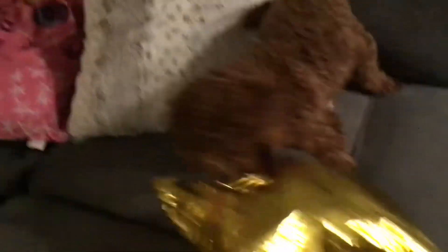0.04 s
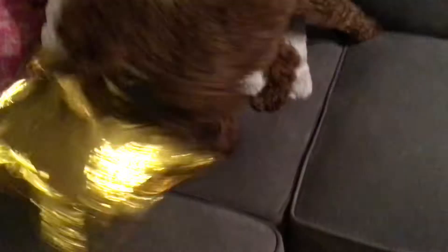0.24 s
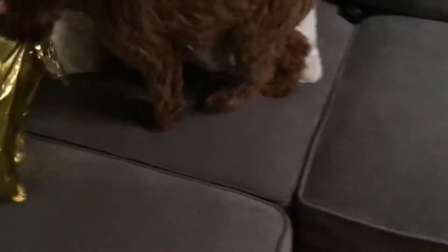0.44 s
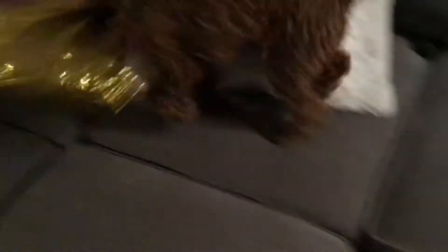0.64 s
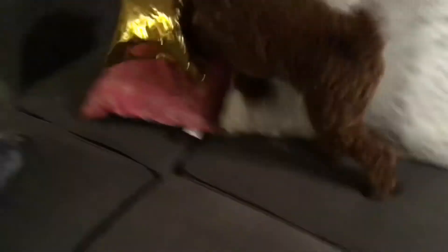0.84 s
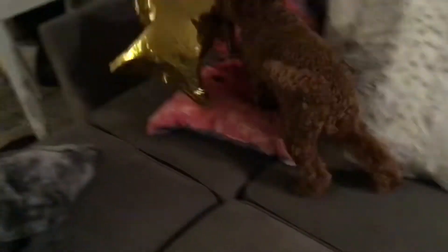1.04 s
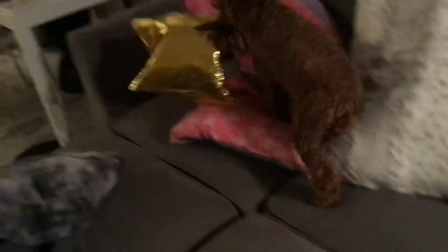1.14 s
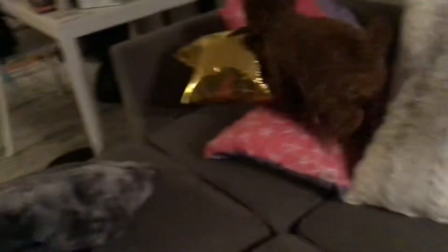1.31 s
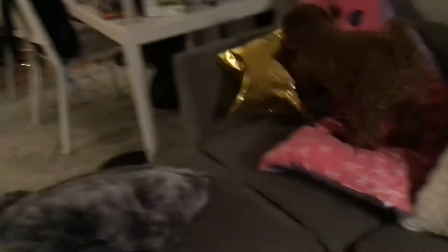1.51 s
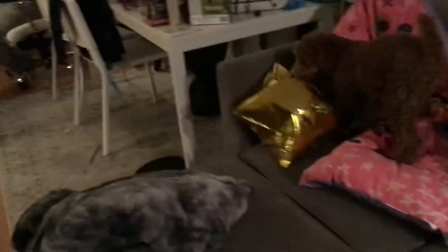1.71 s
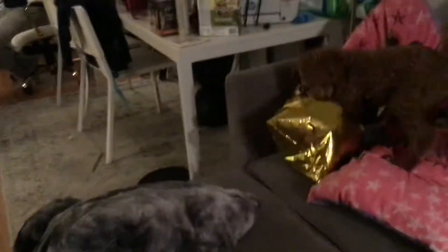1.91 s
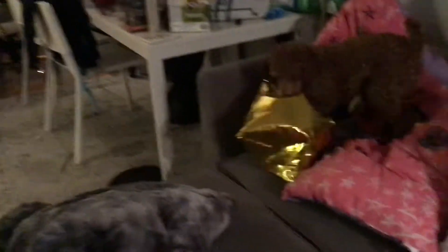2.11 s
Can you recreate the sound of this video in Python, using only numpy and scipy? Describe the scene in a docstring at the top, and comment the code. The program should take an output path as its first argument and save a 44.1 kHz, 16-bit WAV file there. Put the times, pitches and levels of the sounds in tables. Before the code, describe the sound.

A foil balloon crackles and snaps, loud and close, as a dog shakes it on a sofa. The crinkling then turns fainter and patchier, with soft paw thuds and faint chewing ticks in a furnished room.

```python
"""A foil balloon crackles and snaps as a dog shakes it on a sofa, loud and close at first, then
fainter, at the far end of the cushions. Each crumple is a swarm of tiny creases buckling over the
hollow flutter of the slack skin. Paws thud on the cushions, the balloon is bumped now and then,
and chewing makes faint ticks. A furnished room adds a short echo and a quiet rumble."""
import sys
import numpy as np
from scipy import signal
from scipy.io import wavfile
from scipy.ndimage import uniform_filter1d

SR = 44100
rng = np.random.default_rng(int(sys.argv[2]) if len(sys.argv) > 2 else 0)


def output_pcm(signal):
    """Save a mono or channel-first signal as 16-bit PCM at the path in sys.argv[1].

    Samples are clipped to [-1, 1] before scaling.
    """
    pcm = np.clip(np.atleast_2d(signal).T, -1, 1) * 32767
    wavfile.write(sys.argv[1], SR, np.round(pcm).astype(np.int16))


N = 94815  # samples: 2.15 seconds


# Each squeeze of the balloon:
# (peak time [s], level [dB], rise [s], fall [s], extra flutter [dB], tilt toward bright [dB])
CRUMPLE_SWELLS = [(.038, -43.5, 0.026, 0.018, 0.5, 0), (0.094, -43.5, 0.0043, 0.013, -2, 4),
                  (0.134, -40.5, 0.043, 0.031, 1, 0.5), (0.206, -44.5, 0.017, 0.049, 0, 1.5),
                  (0.247, -32, 0.023, 0.024, -1, 0.5), (.287, -32.5, 0.019, 0.032, -3.5, 4),
                  (.325, -33.5, .008, 0.018, 2.5, 1.5), (0.387, -34, 0.037, 0.14, -5, 3.5),
                  (0.437, -25, 0.011, 0.01, -8, 3.5), (0.484, -33.5, 0.012, 0.014, -5, 3),
                  (0.508, -27.5, 0.013, 0.021, -2.5, 4.5), (0.546, -34.5, 0.017, 0.11, -3, 1.5),
                  (0.596, -28, 0.0093, 0.018, -4.5, 7), (0.614, -23, 0.0094, 0.015, -4, 5.5),
                  (0.623, -28, 0.0066, .028, 1.5, -2.5), (.675, -32, 0.04, 0.043, -2.5, 2.5),
                  (0.71, -32.5, 0.0041, 0.0052, -0.5, 7.5), (0.761, -32, 0.041, 0.034, -4, 1.5),
                  (.79, -32, 0.012, 0.028, -4.5, 1.5), (.86, -46.5, 0.028, .035, 4.5, -2.5),
                  (0.979, -42.5, 0.0089, 0.01, -2, 2.5), (1.0, -45, 0.016, 0.032, 1, -1),
                  (1.066, -49, 0.022, 0.026, 2, 1.5), (1.18, -53, 0.042, 0.024, 2, -2.5),
                  (1.208, -57, 0.013, 0.02, 0, 6.5), (1.415, -42, 0.0064, 0.034, -2, 1),
                  (1.448, -41, 0.015, 0.019, 1, 0), (1.481, -45.5, 0.0087, 0.038, -3, 3),
                  (1.521, -48.5, 0.0088, 0.046, 1, 1.5), (1.636, -47, 0.04, .03, -0.5, -0.5),
                  (1.685, -44.5, 0.035, 0.016, -2.5, 0), (1.839, -52, 0.026, 0.028, 2, -3.5),
                  (1.872, -44, 0.024, 0.028, 2.5, 2.5), (1.945, -57, 0.043, 0.07, 7.5, -3.5),
                  (2.03, -57.5, 0.013, 0.025, -7, -5), (2.068, -57.5, 0.017, 0.039, 5, -1),
                  (2.118, -52.5, 0.01, 0.017, 0, 1), (2.142, -47.5, .006, 0.047, -3, 3.5)]
def crumpling(bright_fall_share=0.73):
    """Each crumple swells and fades, making the foil crackle and the skin flutter."""
    t, power = np.arange(N) / SR, np.zeros((3, N))
    fall_shares = np.array([[1], [bright_fall_share], [1]])  # bright creases stop sooner
    for time, db, rise, fall, flutter_db, bright_db in CRUMPLE_SWELLS:
        swell = np.exp(-(np.minimum(t - time, 0) / rise) ** 2)
        fade = np.exp(-np.maximum(t - time, 0) / (fall * fall_shares))
        gains = amp([[db - bright_db], [db + bright_db], [db + flutter_db]])
        power += (gains * swell * fade) ** 2
    dull, bright, hollow = np.sqrt(power)
    return amp(-2) * foil_crackle(dull, bright) + amp(-8) * skin_flutter(hollow)


# The tone of crackling foil: (frequency [Hz], relative level [dB])
FOIL_TONE = [(60, -22), (300, -31), (800, -9), (1300, -1.5), (2200, -3.5), (3300, -2.5), (4800, -4),
             (6200, -5.5), (7700, -5), (8600, -9), (10200, -9), (11500, -14), (15500, -15.5)]
def foil_crackle(dull, bright, creases_per_s=5500, spread_db=3, pitches=24, split_hz=5500):
    """A swarm of mostly small creases; its low and high parts follow the dull and bright curves."""
    swarm = np.zeros(N)
    for hz in np.geomspace(1200, 15000, pitches):
        sizes = amp(spread_db * np.minimum(rng.exponential(1, N), 4))
        buckles = rng.random(N) < creases_per_s / pitches / SR
        crack = crease(hz, ring_s=0.0007, octaves=1.08)
        swarm += signal.oaconvolve(sizes * buckles, crack)[:N] * np.sqrt(hz)
    swarm = even_out(swarm, samples=900)
    low = signal.sosfilt(signal.butter(1, split_hz, fs=SR, output="sos"), swarm)
    return colour(low * dull + (swarm - low) * bright, FOIL_TONE)


def crease(hz, ring_s, octaves, samples=400):
    """The foil buckles once: a sharp crack that dies quickly, scaled to an energy of 1."""
    burst = rng.standard_normal(samples) * np.exp(-np.arange(samples) / SR / ring_s)
    crack = band(burst, hz, octaves)
    return crack / np.linalg.norm(crack)


# The hollow tone of the slack skin: (frequency [Hz], relative level [dB])
SKIN_TONE = [(30, -57), (90, -6.5), (170, -4), (215, -3), (270, -4), (320, 1.5), (360, -5.5), (450, -7),
             (540, -3), (610, -4), (700, -1.5), (900, -7), (1400, -21.5), (3000, -15), (12000, -42)]
def skin_flutter(loudness, flaps_per_s=1500):
    """The loose skin makes many tiny random flaps that blur into a flutter."""
    flaps = rng.standard_normal(N) * (rng.random(N) < flaps_per_s / SR)
    return colour(even_out(flaps, samples=1200) * loudness, SKIN_TONE)


# How strong the foil's highest treble is: (time [s], boost [dB])
TREBLE_BOOST = [(0, 2), (.25, -0.5), (.55, -0.5), (.8, 0), (1.0, 0), (1.3, 1), (1.45, 3.5), (1.68, 3),
                (1.87, 4.5), (2.14, 6)]
def sizzle(foil, edge_hz=11000):
    """The top of the crackle dips a little, then grows brighter toward the end."""
    top = signal.sosfiltfilt(signal.butter(3, edge_hz, "highpass", fs=SR, output="sos"), foil)
    boost_db = np.interp(np.arange(N) / SR, *np.transpose(TREBLE_BOOST))
    return foil + top * (amp(boost_db) - 1)


# Single loud creases: (time [s], level as if lasting one millisecond [dB], pitch [Hz])
BIG_CREASES = [(0.0142, -36.5, 11500), (0.1448, -46, 5000), (0.283, -56, 5000), (.292, -28, 4420),
               (0.379, -36, 6200), (0.4694, -34, 7650), (0.5058, -46, 4500), (0.623, -23, 4700),
               (0.7095, -31, 6800), (0.789, -27.5, 7450), (0.8593, -36, 7940), (1.0698, -44, 7400),
               (1.075, -39.5, 6760), (1.138, -45, 3970), (1.179, -46, 5000), (1.232, -64, 10900),
               (1.245, -53, 4000), (1.2745, -54, 6000), (1.2945, -49.5, 4470), (1.3025, -65, 7000),
               (1.3685, -59, 4500), (1.372, -58, 7500), (1.4753, -42, 6000), (1.833, -37.5, 2800),
               (2.016, -46.5, 4950), (2.029, -48, 9000), (2.0845, -41.5, 5440), (2.1415, -38.5, 6230)]
def snaps():
    """Large creases give way one at a time and stand out from the crackle."""
    out = np.zeros(N)
    for time, db, hz in BIG_CREASES:
        add(out, time, amp(db) * np.sqrt(SR / 1000) * crease(hz, ring_s=0.0018, octaves=0.98))
    return out


# Paws landing on the cushions: (time [s], level [dB], middle pitch [Hz])
PAW_STEPS = [(0.073, -42, 101), (0.167, -42, 110), (0.244, -42.5, 152), (.3, -38, 95.6), (0.332, -43, 72.5),
             (.385, -46, 96), (.463, -38.5, 133), (0.511, -46, 100), (0.626, -37, 81.5), (0.656, -36, 97),
             (0.706, -40.5, 140), (.77, -40.5, 91), (0.906, -47, 136), (0.981, -49, 83.5),
             (1.05, -50, 83.5), (1.237, -52.5, 148), (1.315, -57, 90), (1.427, -48.5, 94), (1.49, -62, 106),
             (1.574, -46.5, 82.4), (1.608, -45, 93), (1.724, -47, 130), (1.77, -55, 89), (1.806, -47, 120),
             (1.855, -58, 90), (1.885, -51, 103), (1.917, -50, 98)]
def paws(rise_s=0.0086, fall_s=0.018, sag=0.25, sag_s=0.023, scuff_db=-9):
    """A soft push into the cushion sinks in pitch, with a scuff of fabric."""
    out, t = np.zeros(N), np.arange(SR // 5) / SR
    loudness = np.minimum(t / rise_s, 1) ** 2 * np.exp(-np.maximum(t - rise_s, 0) / fall_s)
    glide = 1 + sag * (2 * np.exp(-t / sag_s) - 1)  # from above the middle pitch to below it
    for time, db, hz in PAW_STEPS:
        thud = np.sin(2 * np.pi * np.cumsum(hz * glide) / SR)
        scuff = unit(band(rng.standard_normal(len(t)), hz=102, octaves=0.71))
        add(out, time, amp(db) * loudness * (thud + amp(scuff_db) * scuff))
    return out


# Knocks against the balloon: (time [s], level [dB], pitch [Hz])
BALLOON_KNOCKS = [(.143, -44.5, 396), (0.254, -35, 286), (.323, -33.5, 762), (.452, -33.5, 297),
                  (.626, -27.5, 523), (0.634, -31, 262), (.652, -33, 240), (0.9008, -40.5, 556),
                  (1.296, -47.5, 390), (1.324, -56, 290), (1.369, -52.5, 383), (1.689, -46, 480)]
# The tones in one knock: (multiple of the pitch [ratio], relative level [dB], fall [s])
KNOCK_TONES = [(0.548, -2.5, 0.0054), (.8, -7, 0.0054), (1., 3, 0.0048), (1.3, 0, 0.0044),
               (1.75, -6.5, 0.005)]
def bumps(rise_s=0.00067):
    """The half-filled balloon rings briefly at several pitches at once: a hollow knock."""
    out, t = np.zeros(N), np.arange(SR // 10) / SR
    for time, db, hz in BALLOON_KNOCKS:
        knock = np.zeros(len(t))
        for ratio, tone_db, fall in KNOCK_TONES:
            tone = np.sin(2 * np.pi * (hz * ratio * t + rng.random()))
            knock += amp(tone_db) * np.exp(-t / fall) * tone
        add(out, time, amp(db) * np.minimum(t / rise_s, 1) * knock)
    return out


# Spells of chewing: (start [s], end [s], typical tick level [dB])
CHEW_SPELLS = [(0, 0.199, -48.5), (0.898, 1.31, -57), (1.381, 1.407, -72), (1.98, 2.15, -53.5)]
def chewing(ticks_per_s=130, tick_hz=6500, spread_db=3):
    """The jaws work on the foil, making small bright ticks at random moments."""
    out = np.zeros(N)
    for start, end, db in CHEW_SPELLS:
        count = round((end - start) * ticks_per_s)
        for place, size, pitch in rng.uniform(-1, 1, (count, 3)):
            time = start + (end - start) * (place + 1) / 2
            tick = crease(tick_hz * 2 ** (pitch / 2), ring_s=0.00092, octaves=0.85)
            add(out, time, amp(db + spread_db * size) * np.sqrt(SR / 1000) * tick)
    return out


# How long the room rings: (frequency [Hz], time to fade by 60 dB [s])
ECHO_TIMES = [(100, 0.71), (500, 0.36), (2000, 0.35), (6000, 0.31), (15000, 0.25)]
def room_echo(sound, gap_s=0.0035, turn_s=0.003, paths=8, echoes_per_s=5000):
    """Many reflections blur together, and the high ones die first."""
    out, turn, length = np.zeros(N), np.arange(N) / SR / turn_s, SR // 2
    for path in range(paths):
        echoes = rng.standard_normal(length) * (rng.random(length) < echoes_per_s / SR)
        echoes *= np.arange(length) > gap_s * SR
        hz, t, spectrum = signal.stft(echoes, SR, nperseg=256)
        fade = amp(-60 * t / look_up(ECHO_TIMES, hz)[:, None])
        tail = signal.istft(spectrum * fade, SR, nperseg=256)[1]
        # Creases lie all over the balloon, so the sound takes turns among the echo paths.
        share = np.sin(np.pi / 2 * np.minimum((turn - path) % paths, 2))
        out += signal.fftconvolve(sound * share, tail / np.linalg.norm(tail))[:N]
    return out


# The tone of the room's background: (frequency [Hz], relative level [dB])
BACKGROUND_TONE = [(25, -60), (40, -36), (65, -7.5), (100, -11.5), (200, -15), (400, -20), (700, -19.5),
                   (1200, -27), (2000, -25), (3000, -28.5), (8000, -31), (16000, -52)]
def background(level_db=-60.5):
    """A faint, steady rumble with a little hiss."""
    return amp(level_db) * colour(rng.standard_normal(N), BACKGROUND_TONE)


def amp(db):
    """Turns decibels into a number to multiply by."""
    return 10 ** (np.asarray(db) / 20)


def unit(x):
    """Scales a sound to an average power of 1."""
    return x / np.sqrt(np.mean(x ** 2) + 1e-20)


def even_out(x, samples):
    """Holds a sound's power steady, averaged over the given number of samples."""
    return x / np.sqrt(abs(uniform_filter1d(x ** 2, size=samples)) + 1e-9)


def look_up(table, hz):
    """Reads between a table's rows, with frequencies spaced by octaves."""
    frequencies, values = np.transpose(table)
    return np.interp(np.log(hz + 1), np.log(frequencies + 1), values)


def add(mix, time, sound):
    """Mixes a sound in at a time in seconds."""
    part = mix[max(round(time * SR), 0):][:len(sound)]
    part += sound[:len(part)]


def colour(x, tone, size=4096):
    """Gives a sound the tone in a table; plain white noise would keep its power."""
    log_gain = np.log(amp(look_up(tone, abs(np.fft.fftfreq(size, 1 / SR)))))
    response = np.exp(np.conj(signal.hilbert(log_gain)))  # rings after a click, never before
    taps = np.fft.ifft(response).real[:size // 2]
    return signal.fftconvolve(x, taps / np.linalg.norm(taps))[:len(x)]


def band(x, hz, octaves):
    """Gently favours the frequencies within some octaves on either side of hz."""
    edges = np.clip([hz / 2 ** octaves, hz * 2 ** octaves], [10, 20], [SR * .4, SR * .48])
    return signal.sosfilt(signal.butter(1, edges, "bandpass", fs=SR, output="sos"), x)


def scene():
    """The balloon, the dog and the room, mixed into one channel."""
    foil, cracks, thuds = sizzle(crumpling()), snaps(), paws() + bumps()
    echo = room_echo(foil + amp(-7.5) * cracks + amp(-12.5) * thuds)
    return (foil + cracks + thuds + amp(-3.5) * echo + background() + chewing())[None]


def record(dry, bass_cut_hz=58, treble_cut_hz=15850):
    """The microphone drops the deepest bass, then the very highest treble is cut."""
    thin = signal.sosfilt(signal.butter(4, bass_cut_hz, "highpass", fs=SR, output="sos"), dry)
    treble_cut = signal.firwin(511, treble_cut_hz, window=("kaiser", 9), fs=SR)
    return signal.oaconvolve(thin, treble_cut[None], "same")


dry = scene()
out = record(dry)
output_pcm(out)
```